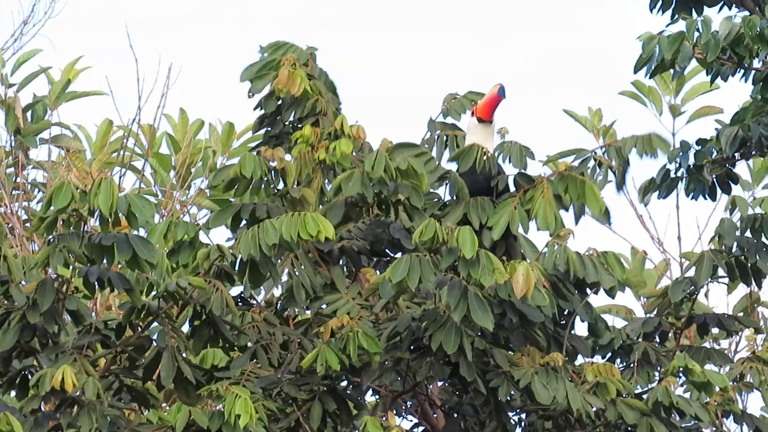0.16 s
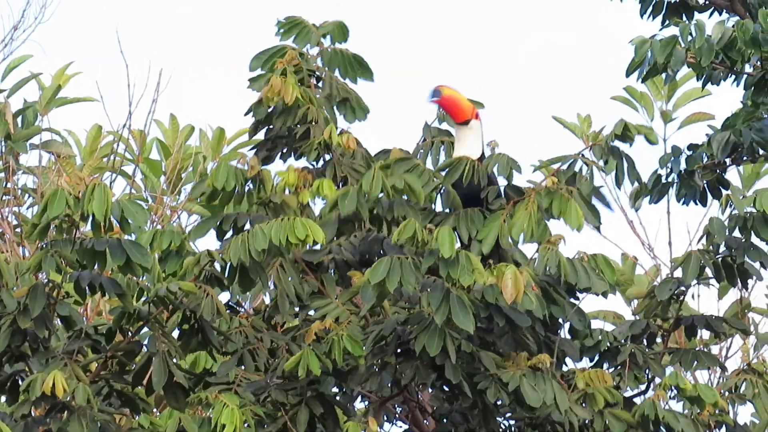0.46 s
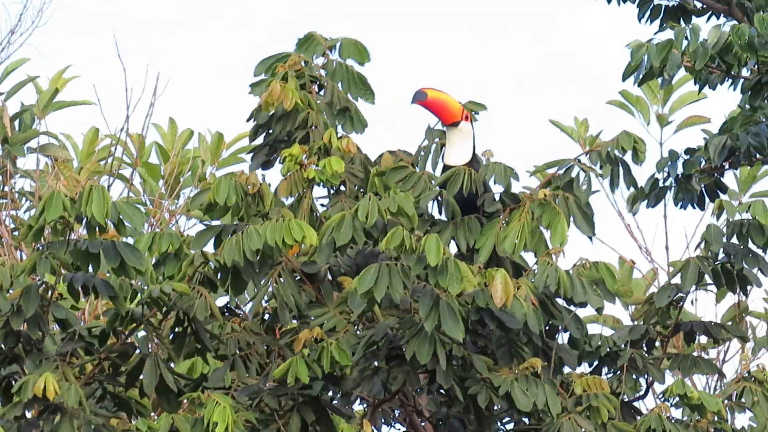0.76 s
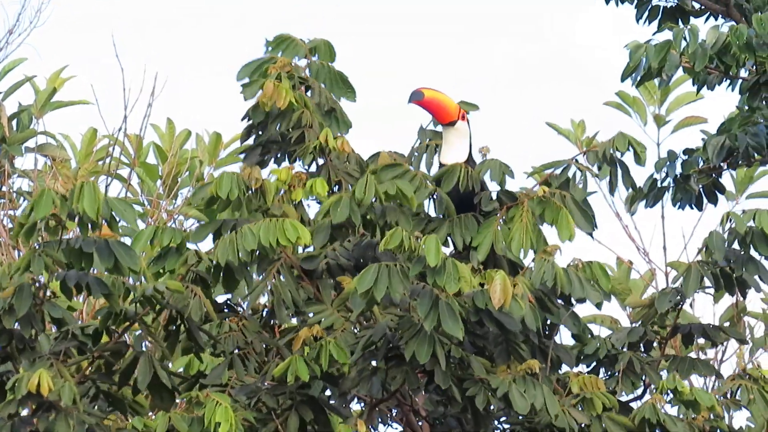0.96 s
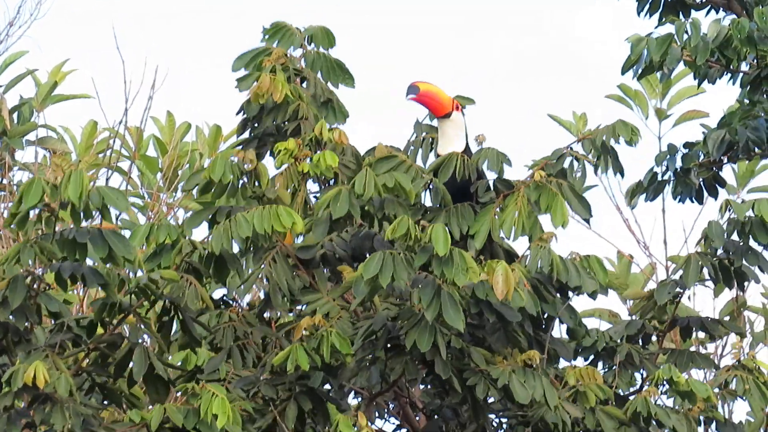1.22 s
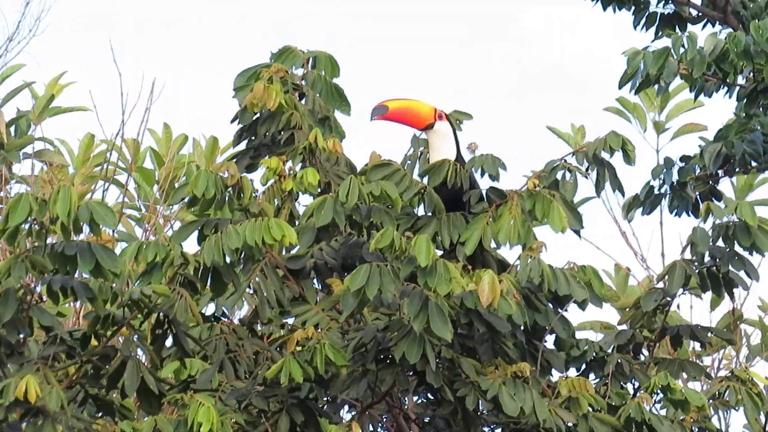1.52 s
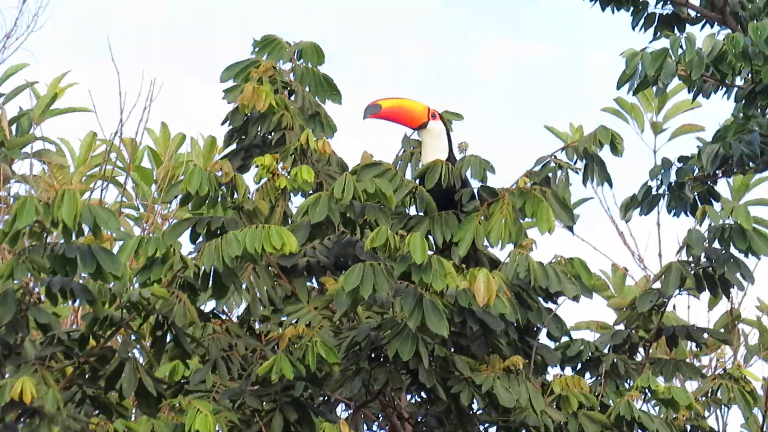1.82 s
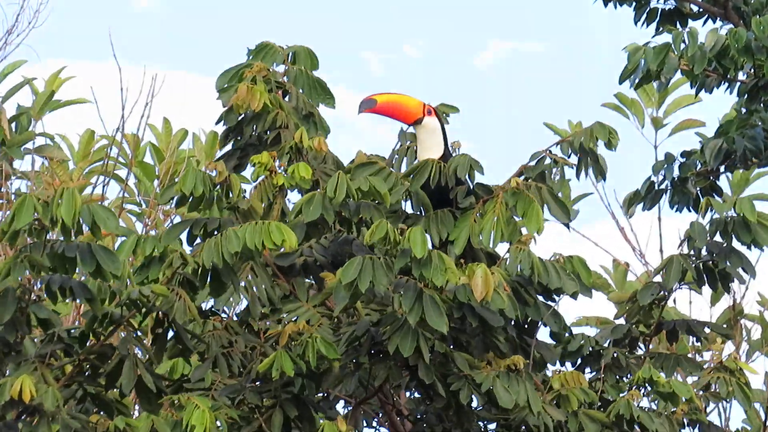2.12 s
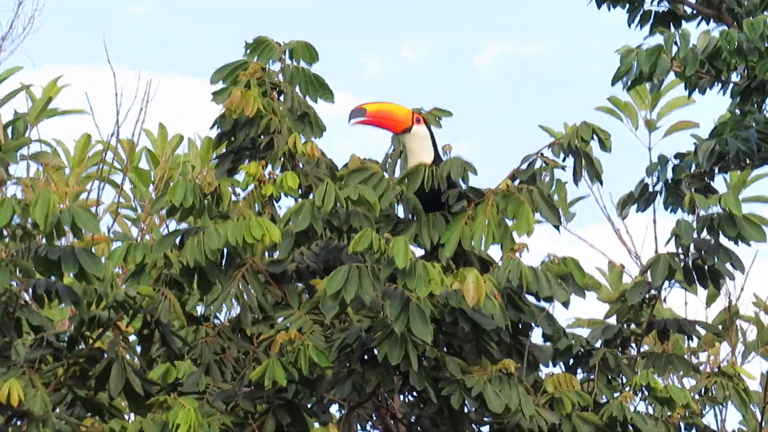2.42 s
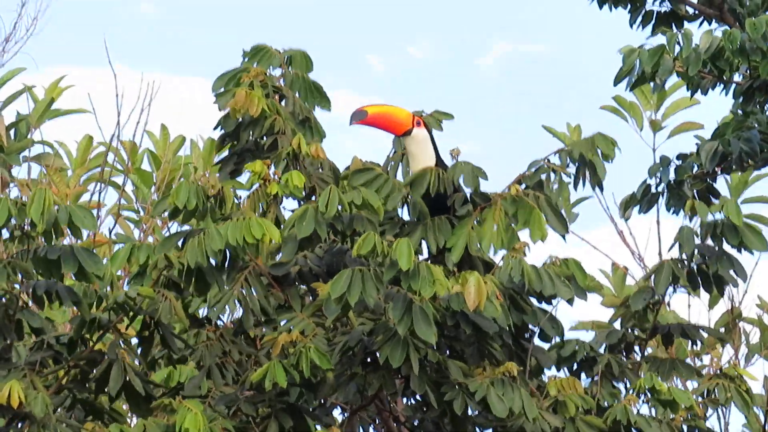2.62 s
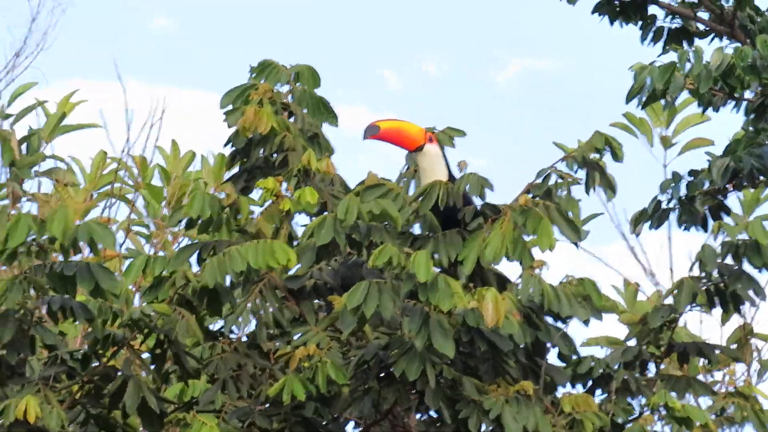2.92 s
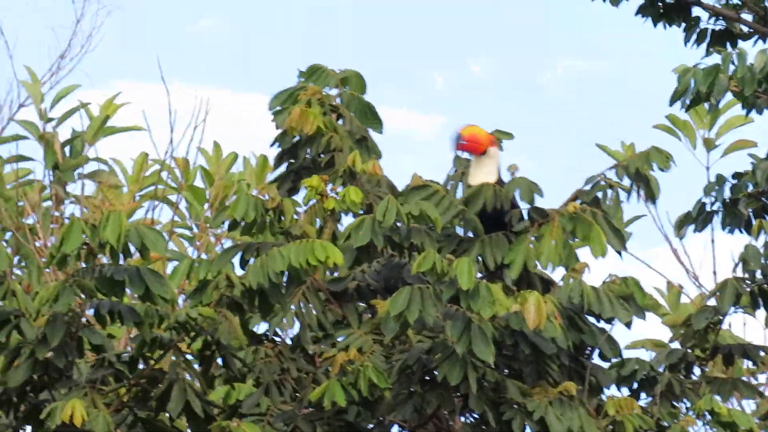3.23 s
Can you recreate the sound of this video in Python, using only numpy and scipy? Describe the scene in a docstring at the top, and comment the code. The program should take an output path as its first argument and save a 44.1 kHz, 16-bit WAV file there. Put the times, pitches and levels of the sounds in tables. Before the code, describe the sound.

Large bird croaks four times, dry and throaty, outdoors above a soft far-off traffic rumble.

```python
"""A treetop among leaves and trees: a toucan croaks four times over the low rumble of distant traffic.
Each croak is a faint tick, then a slowing rattle of nine noise pulses filtered by throat and bill resonances.
A short sine rings inside each pulse, and the voice brightens as the throat opens and the croak swells.
Random reflections off leaves and trees scatter the pulses and give a short tail.
Traffic and hiss are shaped noise; a far engine is two wavering narrow bands that rise and fall."""
import sys
import numpy as np
from scipy import signal
from scipy.fft import rfft, irfft
from scipy.io import wavfile

SR = 44100
rng = np.random.default_rng(int(sys.argv[2]) if len(sys.argv) > 2 else 0)


def wav_record(signal):
    """Record a signal, one row per channel, as 16-bit PCM in the file named by sys.argv[1]."""
    frames = np.transpose(np.atleast_2d(signal))
    bounded = np.clip(frames, -1, 1)
    # unit amplitude maps onto the largest positive 16-bit level
    quanta = np.round(bounded * 32767).astype(np.int16)
    wavfile.write(sys.argv[1], SR, quanta)


N = 148617  # length in samples


def amp(db):
    """Decibels to gain."""
    return 10 ** (np.asarray(db) / 20)


def unit(x):
    """Scales to rms 1."""
    return x / np.sqrt(np.mean(x ** 2) + 1e-20)


def read(points, hz):
    """Reads a table on a log-frequency axis."""
    f, value = np.transpose(points)
    return np.interp(np.log(hz + 1), np.log(f + 1), value)


def add(mix, s, sound):
    """Mixes a sound in at a time in seconds."""
    part = mix[max(round(s * SR), 0):][:len(sound)]
    part += sound[:len(part)]


def bump(hz, centre, width):
    """Power response of a steep resonance."""
    return 1 / (1 + ((hz - centre) / width * np.sqrt(2)) ** 2) ** 3


def noise(gain):
    """Random-phase noise with the given gain in each frequency bin."""
    return irfft(gain * np.exp(2j * np.pi * rng.random(len(gain))), N)


def place(x, pan_db, phase):
    """Level and phase differences between left and right, given on an even grid of frequencies."""
    # half of the difference goes to each side, in opposite directions
    turn = (amp(pan_db) * np.exp(1j * phase)) ** np.array([[.5], [-.5]])
    taps = np.roll(irfft(turn, N), 1024, axis=1)[:, :2049] * np.hanning(2049)
    return signal.oaconvolve(x, taps, "same", axes=1)


# Spectrum of traffic and air: (frequency [Hz], relative level per Hz [dB])
AIR_SPECTRUM = [(12, -30), (24, -14), (42, -17), (50, -4), (82, 0.5), (100, -1), (118, -1.5), (142, -7.5),
                (168, -5), (250, -7), (320, -13), (460, -15), (540, -21.5), (680, -20), (1100, -24),
                (1500, -29), (2200, -35.5), (4000, -42), (7000, -48.5), (10000, -54.5), (13000, -58.5),
                (15500, -68)]
# Stereo width of the air: (frequency [Hz], side minus mid [dB])
AIR_WIDTH = [(30, -20), (100, -25), (250, -24), (450, -11), (650, -18.5), (1200, -13.5), (2200, -8),
             (7000, -7), (11000, -27)]
# Balance of the air: (frequency [Hz], left minus right [dB])
AIR_BALANCE = [(40, 0), (150, -2.3), (350, -.5), (700, 1), (10000, 0)]
# Phase by which the left leads: (frequency [Hz], phase [rad])
AIR_LEAD = [(30, 0), (95, 0.13), (250, 0.76), (470, 1), (540, 0.18)]
AIR_DB = -36  # rms level


def air():
    """Distant traffic and faint hiss: shaped noise, nearly mono in the bass."""
    hz = np.fft.rfftfreq(N, 1 / SR)
    gain = amp(read(AIR_SPECTRUM, hz))
    mid = noise(gain)
    side = noise(gain * amp(read(AIR_WIDTH, hz)))
    stereo = np.array([mid + side, mid - side])
    placed = place(stereo, read(AIR_BALANCE, hz), read(AIR_LEAD, hz))
    return amp(AIR_DB) * unit(placed)


# Low orders of a far engine: (frequency [Hz], width [Hz], relative level [dB])
ENGINE_ORDERS = [(32.2, 4.1, -11), (67, 10, 0)]
# Swells of the engine, before its trim: (time [s], level [dB])
ENGINE_SWELL = [(0.0, -70), (0.06, -45), (0.37, -45), (0.47, -63), (0.63, -32.5), (0.84, -40.5),
                (1.1, -35.5), (1.16, -39.5), (1.7, -35), (2.01, -44), (2.23, -29), (2.45, -50),
                (2.51, -39.5), (2.77, -34), (2.92, -40), (3.37, -48)]
ENGINE_TRIM_DB = -2


def drone():
    """A far engine: two wavering low orders that swell and fade, slightly louder on the right."""
    hz, t = np.fft.rfftfreq(N, 1 / SR), np.arange(N) / SR
    orders = np.zeros(N)
    for f, width, db in ENGINE_ORDERS:
        z = signal.hilbert(noise(np.sqrt(bump(hz, f, width))))
        # more than evens out the noise's level changes, turning its dips into peaks
        wavering = z.real / (abs(z) + 1e-12) ** 1.16
        orders += amp(db) * unit(wavering)
    swell_db = np.interp(t, *np.transpose(ENGINE_SWELL))
    # the left is 0.5 dB softer, the right 0.5 dB louder
    return orders * amp(ENGINE_TRIM_DB + swell_db) * amp([[-.5], [.5]])


# Stereo width of the reflections: (frequency [Hz], side over mid [ratio])
REFLECTION_WIDTH = [(800, .25), (1750, 0.18), (3000, 0.29), (5000, 0.44), (7000, 0.7), (9000, 1.2)]


def scatter(x, t60s, delay_s):
    """A cloud of small reflections, each band dying at its own speed, widest in the treble."""
    # about 4000 random reflections a second
    taps = rng.standard_normal((2, SR)) * (rng.random((2, SR)) < 4000 / SR)
    hz, t, z = signal.stft(taps, SR, nperseg=256)
    z[1] *= read(REFLECTION_WIDTH, hz)[:, None]
    decay = amp(-60 * t / read(t60s, hz)[:, None])
    tail = signal.istft(z * decay, SR, nperseg=256)[1]
    tail /= np.linalg.norm(tail[0])
    tail = np.pad(tail, ((0, 0), (round(delay_s * SR), 0)))
    mid, side = signal.fftconvolve(x[None], tail, axes=1)[:, :N]
    return np.array([mid + side, mid - side])


# Decay of the surrounding trees: (frequency [Hz], time to fall 60 dB [s])
TREE_DECAY = [(500, 1), (1700, 0.7), (3500, 0.58), (6000, 0.37), (12000, 0.43)]
# Colour of what the trees send back: (frequency [Hz], gain [dB])
TREE_COLOUR = [(1400, -1), (1750, 0.5), (2100, 1.5), (2550, 6), (2900, -0.5), (3450, 10), (3750, 0),
               (4400, 5), (7000, 4.5)]
TREE_DB, TREE_DELAY_S = -7, .025


def trees(bird):
    """The surrounding trees recolour the voice and return it late as a short tail."""
    hz = np.fft.rfftfreq(N, 1 / SR)
    coloured = irfft(rfft(bird) * amp(read(TREE_COLOUR, hz)), N)
    return amp(TREE_DB) * scatter(coloured, TREE_DECAY, TREE_DELAY_S)


LEAF_DB, LEAF_T60_S, LEAF_DELAY_S = 0, 0.15, .004


def leaves(bird):
    """Nearby leaves scatter the voice early, with the same fast decay in every band."""
    return amp(LEAF_DB) * scatter(bird, [(1000, LEAF_T60_S)], LEAF_DELAY_S)


RASP_RISE_S, RASP_FALL_S = 0.0012, 0.0024
RASP_HOLD_S = (.0055, .008)  # (at the start, fully open)
SNAP = 0.11  # click on the first sample, gone once the throat is open


def rasp(opening, size=1024):
    """One raw pulse: a snap with a short flutter at first, a longer burst once the throat is open."""
    t = np.arange(size) / SR
    hold = np.interp(opening, [0, 1], RASP_HOLD_S)
    rise = np.minimum(t / RASP_RISE_S, 1)
    shape = rise * np.exp(-np.maximum(t - hold, 0) / RASP_FALL_S)
    z = rfft(shape * rng.standard_normal(size))
    evened = irfft(z / np.sqrt(abs(z) + 1e-9))  # partly flattens the random spectrum
    puff = evened * np.sqrt(shape)
    puff /= np.linalg.norm(puff)
    puff[0] += SNAP * (1 - opening)
    return puff


TONE_HZ, TONE_DB = (1490, 1760), (-27, -19.5)  # (at the start, fully open)
TONE_S, TONE_WANDER = .014, .012  # length, relative scatter of pitch


def tone(opening):
    """A short sine at the main resonance that swells and dies within one pulse."""
    t = np.arange(0, TONE_S, 1 / SR)
    hz = np.interp(opening, [0, 1], TONE_HZ) * (1 + TONE_WANDER * rng.standard_normal())
    swell = np.sin(np.pi * t / TONE_S) ** 2
    ring = swell * np.sin(2 * np.pi * (hz * t + rng.random()))
    return amp(np.interp(opening, [0, 1], TONE_DB)) * ring / np.linalg.norm(ring)


# Resonances of throat and bill:
# (frequency [Hz], width [Hz], level at the start [dB], level when fully open [dB])
RESONANCES = [(584, 385, -19, -19), (1333, 118, -1.5, -16), (1523, 185, 1.5, -6.5), (1760, 222, -8.5, -4),
              (1887, 104, -15, -9.5), (2550, 780, -13, -14.5), (2833, 250, -10.5, -8.5),
              (3224, 210, -11.5, -23), (3554, 425, -18, -9.5), (4226, 330, -16, -13), (4650, 220, -30, -19),
              (5187, 290, -25, -17), (5900, 1300, -45.5, -29.5), (6670, 1850, -56, -37.5),
              (8800, 3400, -57.5, -48.5)]
BILL_HZ, BILL_WIDTH_HZ, HISS_HZ = 4280, 240, 6850


def throat(opening, colour, size=2048):
    """Minimum-phase ring of throat and bill at one opening, in the colour of one croak."""
    tilt_db, hiss_db, bill_db = colour
    hz = abs(np.fft.fftfreq(size, 1 / SR))
    power = sum(amp(shut + (wide - shut) * opening) ** 2 * bump(hz, f, w)
                for f, w, shut, wide in RESONANCES)
    # the treble tilts from the fourth resonance upward
    db = tilt_db * np.log2(np.maximum(hz / RESONANCES[3][0], 1))
    db += bill_db * bump(hz, BILL_HZ, BILL_WIDTH_HZ)
    db += hiss_db * (1 - 1 / (1 + (hz / HISS_HZ) ** 10))
    log_gain = np.log(np.sqrt(power) * amp(db) + 1e-5)
    return np.fft.ifft(np.exp(np.conj(signal.hilbert(log_gain)))).real


# The four croaks, levels before the overall gain:
# (first full pulse [s], level [dB], first gap between pulses [s], tick relative to the first pulse [dB],
#  time to full effort [s], fade after it [dB/s], treble tilt [dB/octave], hiss above 7 kHz [dB],
#  bill ring [dB])
CROAK_LIST = [(0.3434, -1.5, 0.016, -24, 0.078, 37, -0.33, 3, -3.5),
              (1.2710, 0, 0.016, -6, 0.1033, 243, -0.2, 1.5, -6),
              (2.334, -0.9, .0159, -8, 0.066, 121, 0.4, -6.5, 2.5),
              (3.1404, 0, 0.016, -24, 0.12, 378, -0.47, 4.5, -3)]
CROAK_GAIN_DB = 18
PULSE_COUNT, SLOWING = 9, .11  # the gap grows as this power of the pulse number
OPEN_S = 0.04  # time for the throat to open
START_DB, SWELL_BEND = -8.5, 0.57  # effort at the first pulse, shape of the swell
UNEVEN_DB = .5  # scatter of strength between pulses
TICK_LEAD_S = .0137
TICK_COLOUR = (-5.5, 0, 0)  # (treble tilt [dB/octave], hiss [dB], bill ring [dB])


def toucan():
    """Each croak: a faint tick, then uneven pulses that slow down and swell while the throat opens."""
    out = np.zeros(N)
    for start, db, gap, tick_db, peak_s, fade_db, *colour in CROAK_LIST:
        tick = amp(db + START_DB + tick_db) * throat(0.85, TICK_COLOUR)
        add(out, start - TICK_LEAD_S, tick)
        gaps = gap * np.arange(1, PULSE_COUNT) ** SLOWING
        for s in np.append(0, np.cumsum(gaps)):
            opening = min(s / OPEN_S, 1)
            effort_db = START_DB * (1 - min(s / peak_s, 1) ** SWELL_BEND)
            effort_db -= fade_db * max(s - peak_s, 0)
            strength = amp(db + effort_db + UNEVEN_DB * rng.standard_normal())
            pulse = signal.fftconvolve(rasp(opening), throat(opening, colour))
            add(out, start + s, strength * pulse)
            add(out, start + s, strength * tone(opening))
    return amp(CROAK_GAIN_DB) * out


BIRD_PAN_DB, BIRD_LAG_S = 1.0, .000011  # the left is a little louder and earlier


def scene():
    """The bird among leaves and trees, over traffic and engine."""
    bird, hz = toucan(), np.fft.rfftfreq(N, 1 / SR)
    voice = bird + leaves(bird) + trees(bird)
    placed = place(voice, BIRD_PAN_DB, 2 * np.pi * hz * BIRD_LAG_S)
    return placed + air() + drone()


EDGE_HZ = 15600


def record(dry):
    """Band limit: a steep linear-phase low-pass takes off the extreme treble."""
    lowpass = signal.firwin(511, EDGE_HZ, window=("kaiser", 9), fs=SR)
    return signal.oaconvolve(dry, lowpass[None], "same")


dry = scene()
out = record(dry)
wav_record(out)
```